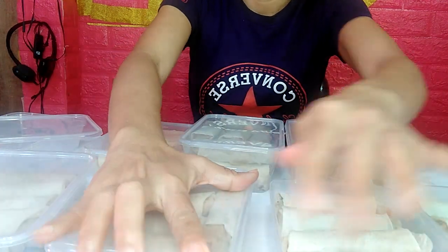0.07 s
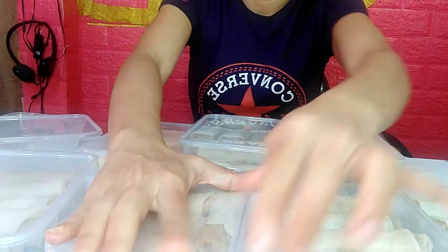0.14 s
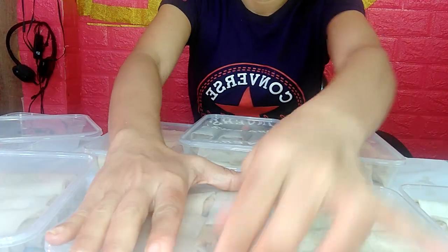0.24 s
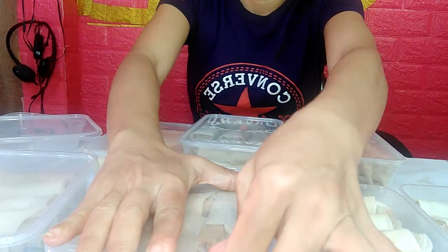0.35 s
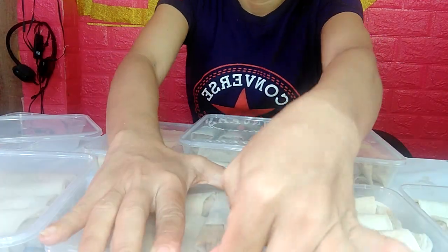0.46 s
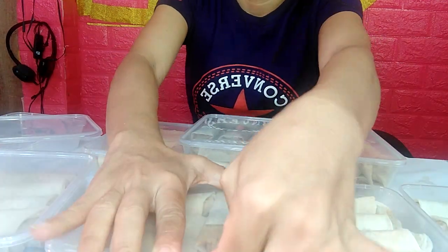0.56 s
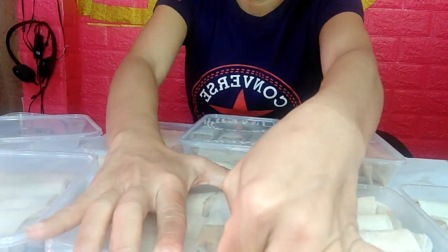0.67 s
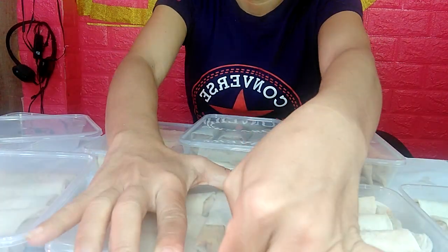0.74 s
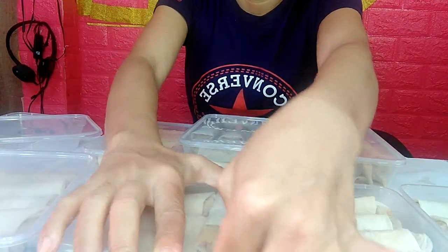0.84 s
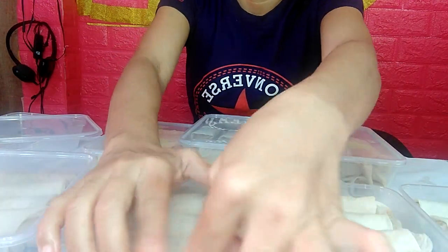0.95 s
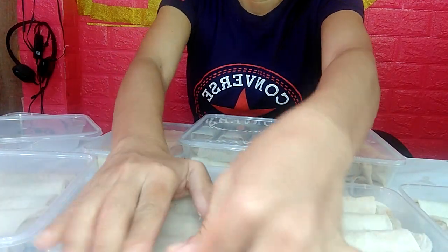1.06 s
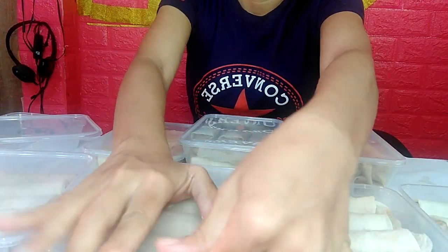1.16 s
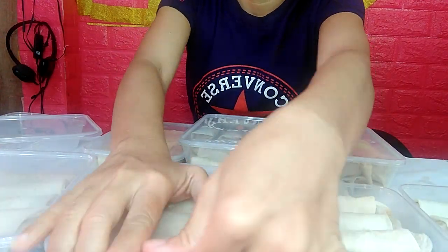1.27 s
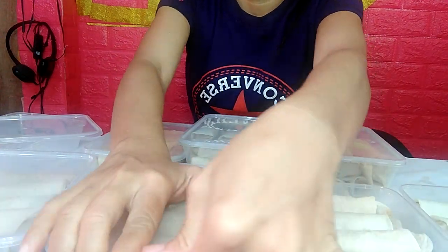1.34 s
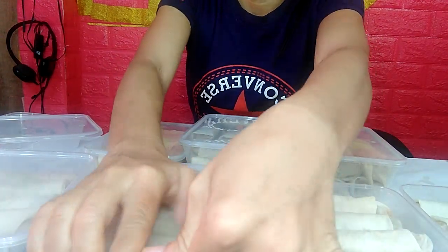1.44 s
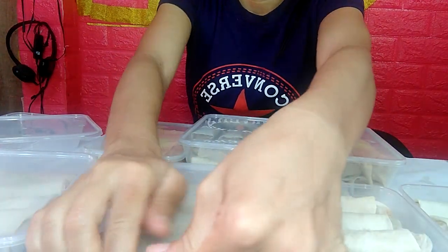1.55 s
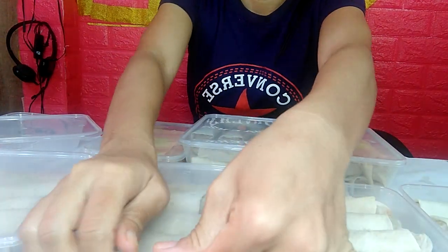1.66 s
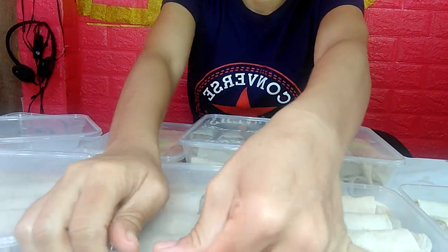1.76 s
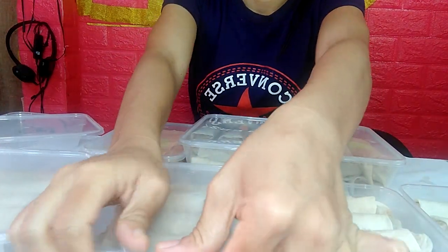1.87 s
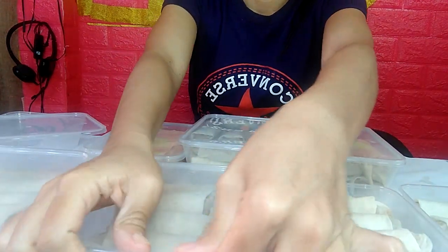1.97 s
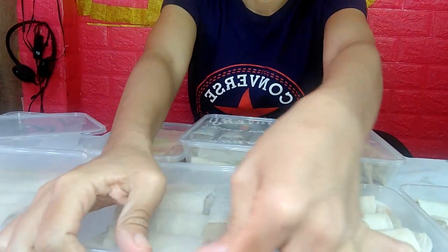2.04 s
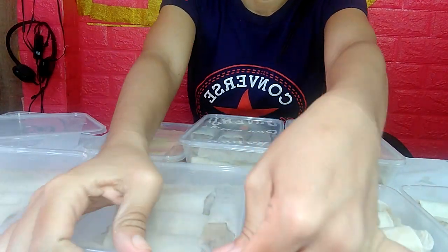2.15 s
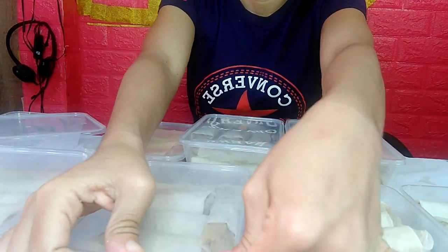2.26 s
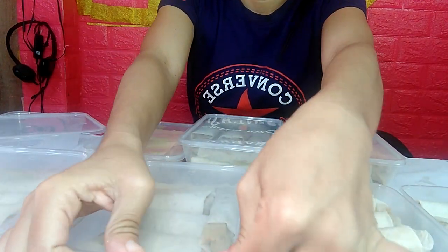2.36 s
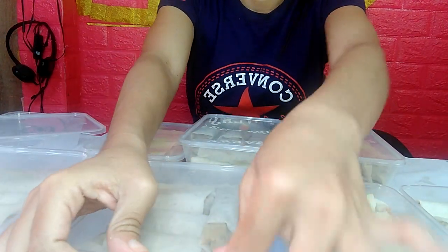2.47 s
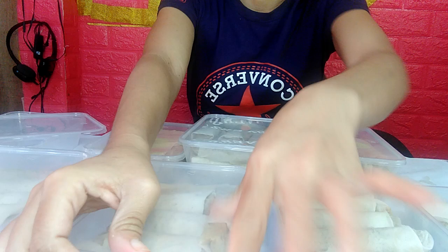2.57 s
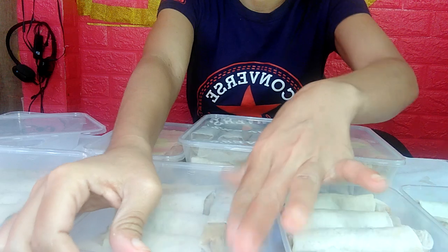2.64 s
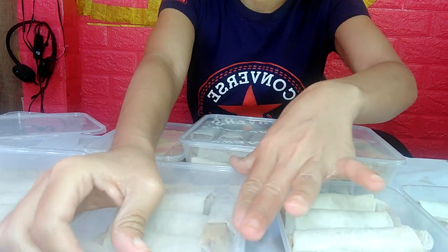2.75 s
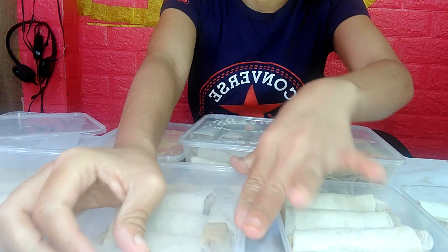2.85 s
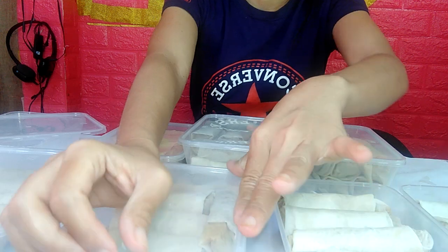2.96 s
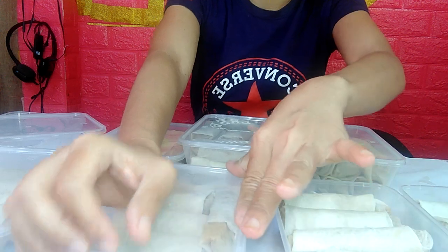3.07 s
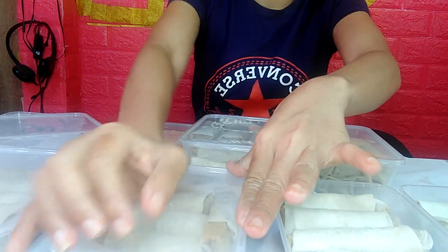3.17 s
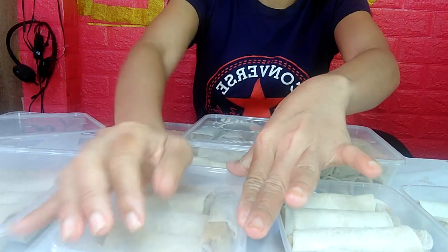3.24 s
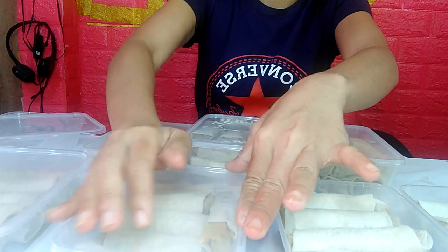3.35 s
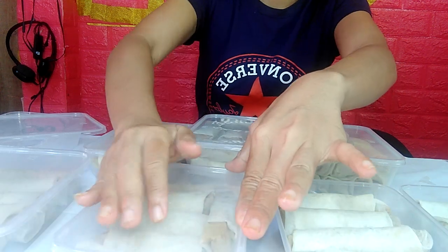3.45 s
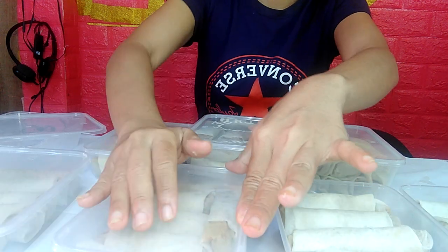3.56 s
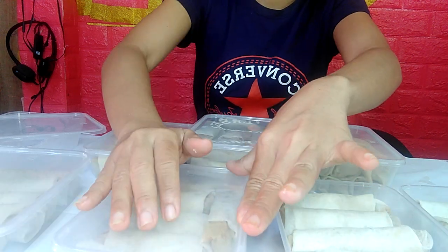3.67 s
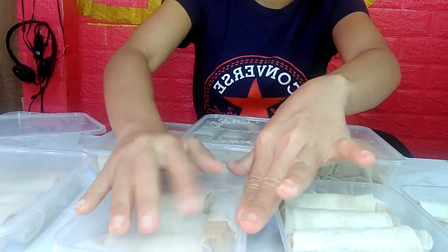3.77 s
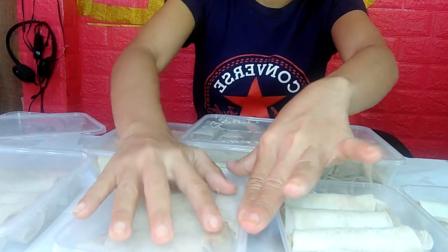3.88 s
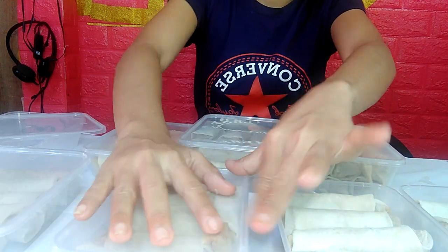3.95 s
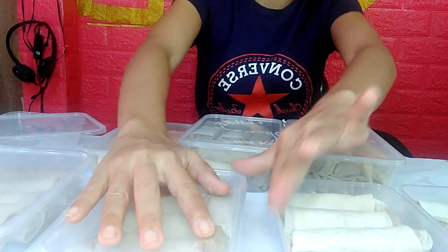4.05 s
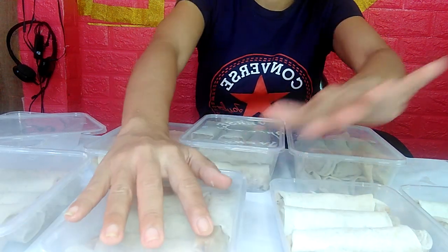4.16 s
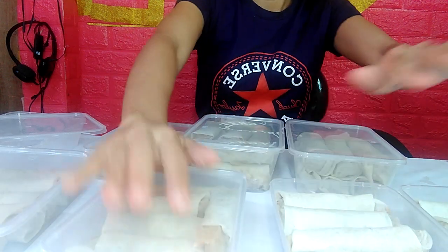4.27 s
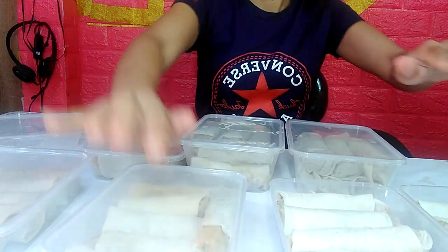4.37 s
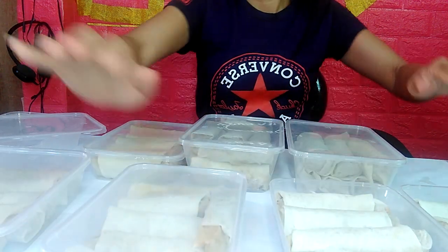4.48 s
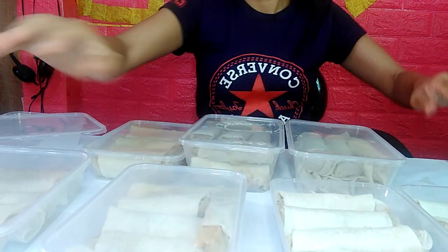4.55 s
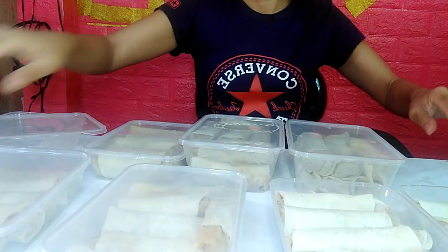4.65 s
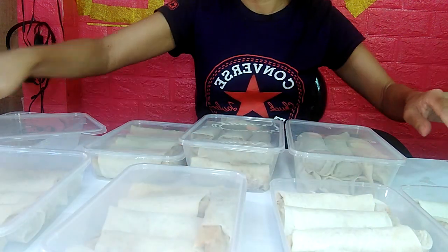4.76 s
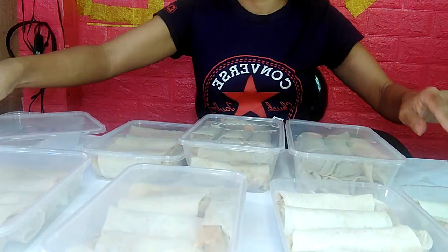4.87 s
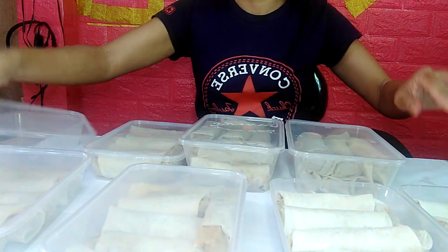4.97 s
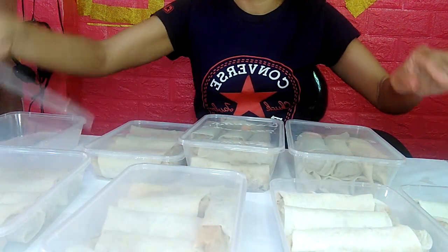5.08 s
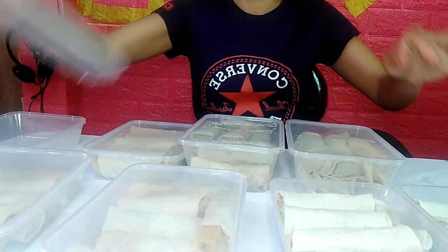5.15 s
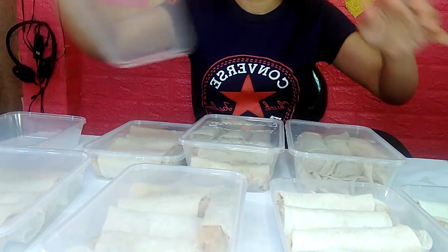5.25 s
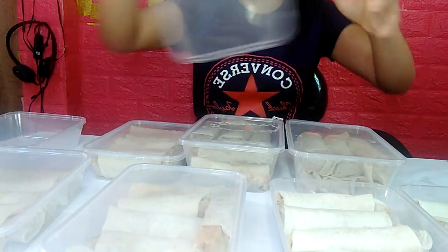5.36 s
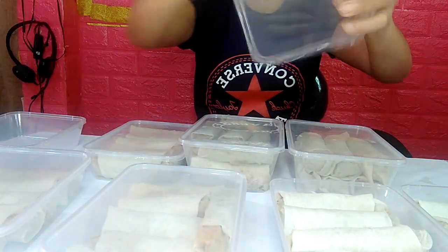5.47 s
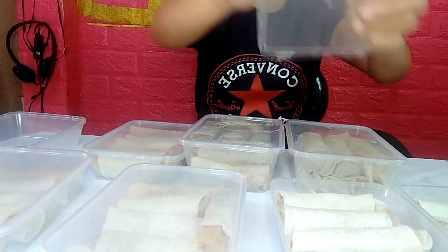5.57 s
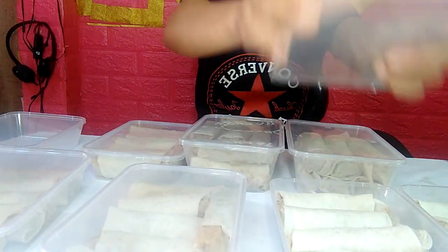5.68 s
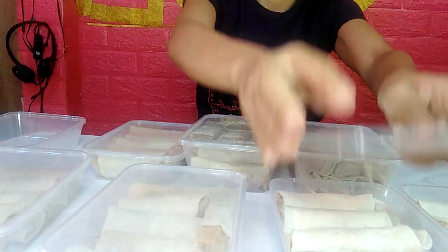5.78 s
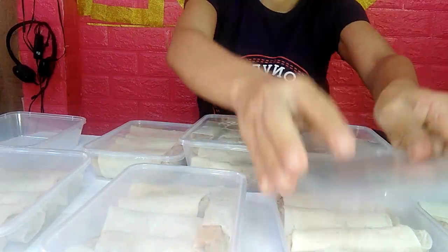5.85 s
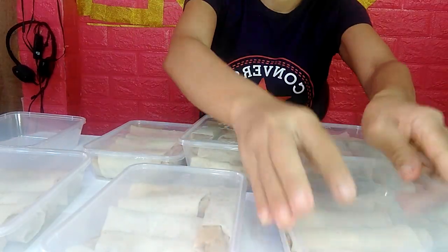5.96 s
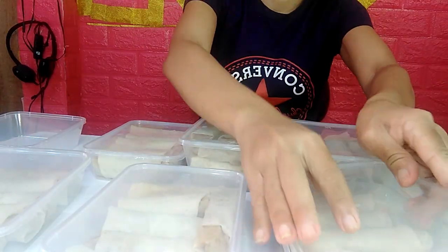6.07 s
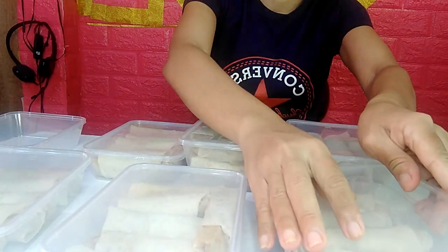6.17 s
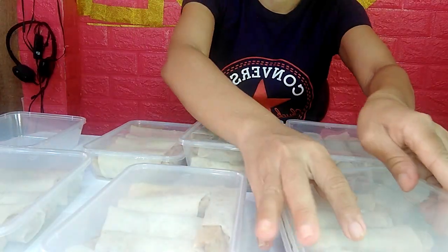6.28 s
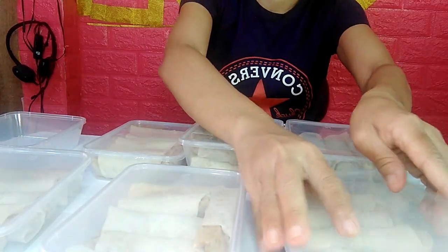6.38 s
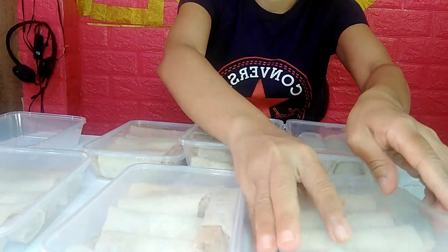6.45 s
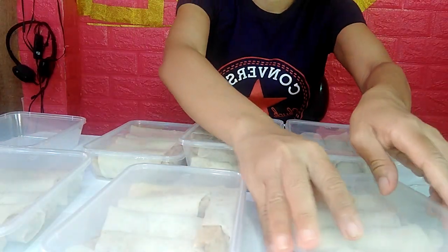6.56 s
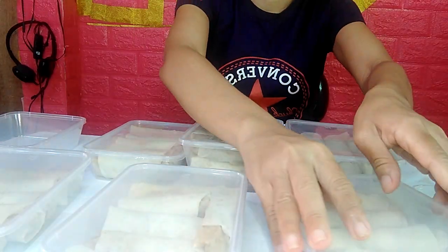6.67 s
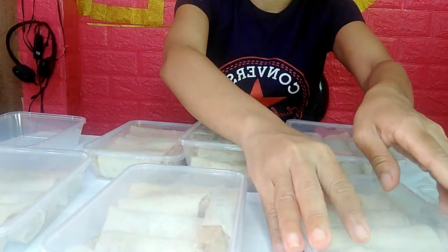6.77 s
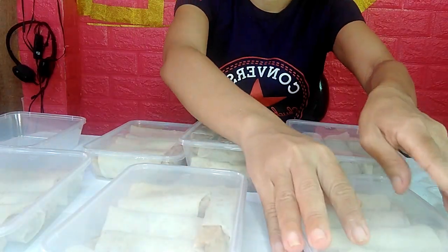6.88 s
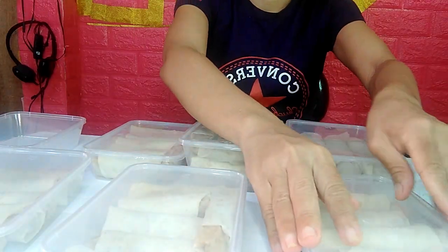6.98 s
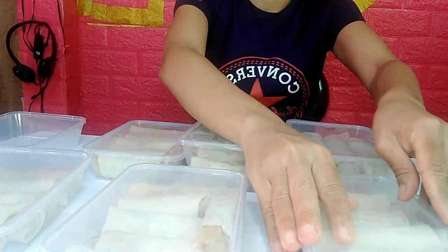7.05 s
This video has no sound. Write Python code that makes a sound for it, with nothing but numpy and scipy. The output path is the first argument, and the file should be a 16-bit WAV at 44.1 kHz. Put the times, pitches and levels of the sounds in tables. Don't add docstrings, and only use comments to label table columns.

```python
import sys
import numpy as np
from scipy import signal
from scipy.fft import rfft, irfft
from scipy.io import wavfile
from scipy.ndimage import uniform_filter1d, minimum_filter1d

SR = 44100
rng = np.random.default_rng(int(sys.argv[2]) if len(sys.argv) > 2 else 0)


def ratio_of_db(decibels):
    return 10 ** (np.asarray(decibels, float) / 20)


def to_wav(s):
    ch = np.atleast_2d(s).T
    pcm = np.round(np.clip(ch, -1, 1) * 32767)
    wavfile.write(sys.argv[1], SR, pcm.astype(np.int16))


N = 313991

# time [s], peak at 1.5-4 kHz [dB],
# then panel, edge, sizzle [dB relative to it].
SNAPS = [(0.5546, -45.5, 3, -15, -21.5), (0.7912, -12, -5, -4.5, 0.5), (0.882, -30.5, -3, -14, -1),
         (0.9271, -35, -12.5, -10, -6.5), (1.0561, -45.5, 15.5, -22.5, -19), (1.0952, -44.5, 10.5, -2.5, 3),
         (1.5291, -45, 19, -15, -4), (1.5484, -30.5, -4, -11.5, -3), (1.6088, -29, 7, -59, -53),
         (1.6739, -31, 8, -27, 6), (1.6826, -26.5, 4.5, -4, -1.5), (1.8712, -31.5, -29.5, 2, -3),
         (1.985, -32.5, -28.5, 6, -3.5), (2.1478, -43, -10, 12, 4), (2.1531, -42, -11.5, 2, 12.5),
         (2.3441, -11, -7, -13.5, -0.5), (2.815, -41.5, 3, -29, -4.5), (3.0574, -20.5, -3.5, 3, 0),
         (3.0677, -18.5, 2.5, -23, 5), (3.1872, -45, -17.5, 2.5, -1.5), (3.6565, -28, 15, 2, 8),
         (4.1847, -42.5, 7.5, 8.5, 5), (5.1876, -44, -24.5, -6, 9), (6.0154, -22.5, -16.5, -0.5, 1.5),
         (.2298, -22, 1, -14.5, -5), (.2350, -20, 7.5, -9, -2.5), (.2372, -13, 0, -7, -0.5),
              (.2385, -8, -5.5, -6, -0.5), (.2505, -24.5, 3, -3, -0.5), (1.6795, -33.5, 3.5, -3.5, 4),
              (1.6808, -30, 0, -5.5, 7.5), (2.3452, -15, -10.5, -8, 0), (2.351, -19, 5, -7.5, -2.5),
              (2.3583, -25, -4, -8, 2), (2.363, -22, -6.5, -8.5, 4), (2.3725, -22, -6, -12.5, -0.5),
              (2.3852, -30.5, -1.5, -10, -1.5), (3.0588, -23, -8.5, 6, 7), (3.0644, -37.5, -5, 19, 13),
              (3.6505, -52, 2, 2, 8), (3.6533, -45, -14, -8, 9), (4.1785, -51.5, 10, 0, 6.5),
              (6.0079, -52, -11.5, 0, 1), (6.0245, -30, -5.5, 0, 0), (6.0367, -43, 4.5, -3, -9.5),
              (6.0528, -39.5, -1, -5, 3), (6.075, -45, 2.5, 3, 3)]
SNAP_BANDS_HZ = [60, 350, 950, 2800, 5200, 8300, 16000]
SNAP_ENDS_DB = [-12.5, -37.5]
BODY_DB = -4.5
# frequency [Hz], gain [dB].
LID = [(700, 2), (1100, 1), (1950, 1), (2900, -0.5), (5500, 0.5), (7700, -1), (11000, 0)]
FIRST_PRESSES = {.236: [(2163, -5), (2950, 4), (5790, -5.5), (7130, 9), (8130, 4), (8950, -5)],
                 .791: [(1210, 5.5), (2240, -10), (2990, 6), (3900, -8.5), (7300, 8), (7950, 8),
                 (10100, 9)], .882: [(2950, 7), (5650, 7), (7630, 7), (9440, -9), (10590, 7), (12400, 8)],
                 .927: [(2950, 8), (3800, -14), (4850, 11), (7000, 12), (8700, -10), (9880, 14),
                 (10570, 19), (11700, 22)], 1.548: [(1160, 8), (4270, 7.5), (5500, -5), (6160, -9),
                 (7460, 17.5), (8660, 9.5), (9530, 7), (11800, -16)], 1.609: [(2250, 10.5), (3680, -17)],
                 1.678: [(2070, 8.5), (3650, -9), (4100, -10), (6520, 8), (7220, 7), (7980, -7),
                 (10280, 9)], 1.871: [(1300, 11), (2250, -17), (3090, 6), (4350, 6), (6210, -6),
                 (6830, 5.5), (7385, 7), (8100, -5), (9120, 9), (11500, 8)], 1.985: [(2990, 12), (4177, -6),
                 (4970, 5.5), (6250, -15), (6850, -8), (7350, 6), (7870, -9), (9470, -10)],
                 2.149: [(2400, -12), (3100, 10), (4410, 10), (5300, -10), (6620, 10), (7120, 10),
                 (7620, 7), (9640, -15), (10900, 8)], 2.344: [(2500, 3.5), (3350, -5), (4757, -5),
                 (6083, -5), (7224, 5)]}
LATER_PRESSES = {3.062: [(4000, -5.5), (5620, -5), (7200, -7.5)], 3.187: [(4590, 13), (5370, -8),
                 (5900, -11), (6750, 10)], 3.656: [(2606, -5.5), (3025, 6), (3400, -7), (3910, 7),
                 (4500, -7), (5157, 7), (8000, -17), (8645, 9), (11950, 16), (12810, 6)],
                 4.182: [(1510, 15.5), (2550, -13), (4610, 14), (5050, -9), (5670, 6), (6590, 15),
                 (7370, -15), (8170, 17.5), (9520, 8)], 5.188: [(4000, -12), (4900, -10), (5400, 6),
                 (6320, 8), (6950, 16), (7700, -9), (9960, -13), (12000, 10)], 6.015: [(1450, -8),
                 (4920, -8), (5970, -17.5), (7810, 6.5), (8600, -12.5), (10940, -8)], 6.336: [(1796, 16),
                 (2734, -7), (3290, -11), (4070, 18), (5390, -9.5), (6700, 12), (9210, 15), (10190, 11)],
                 6.417: [(2045, 14), (3140, -8.5), (3660, 20), (4910, -13), (5700, 10), (6560, 12.5),
                 (8700, 11), (9240, 20), (11090, -13)], 6.46: [(1200, -6), (1970, 6.5), (2490, 5),
                 (3291, -8)]}
MODE_WIDTH_HZ = 200

# time [s], peak at 1.5-4 kHz [dB], brightness [dB].
CRUNCH = [(6.2504, -46.5, -24.5), (6.3363, -33, -17.5), (6.3446, -46.5, -14), (6.4143, -34.5, -13.5),
          (6.4194, -27.5, -14), (6.438, -46, 1), (6.4452, -32, -1.5), (6.4485, -28, -3.5), (6.4644, -33, 5),
          (6.4672, -29.5, 0.5), (6.4697, -33, 0), (6.4805, -31.5, 3), (6.484, -25.5, 3), (6.4885, -33, -7),
          (6.493, -33.5, -13), (6.4985, -33.5, 0.5), (6.5025, -34, 5), (6.5088, -43.5, -5),
          (6.5306, -33.5, -2), (6.5492, -40, -8.5)]
CRUNCH_HZ = [300, 1150, 1650, 2650, 3300, 4500, 8300, 15000]
CRUNCH_PANEL_DB, NOTCH_DB = -20.5, -10
# start, loudest moment, end [s].
CRACKLE_S = (6.449, 6.487, 6.565)
CRACKLE_DB, CRACKLE_FADE_DB, CRACKLE_BRIGHT_DB = -35.5, -12.5, 0.5
# time [s], peak at 1.5-4 kHz [dB], brightness [dB].
TICKS = [(0.6513, -55.5, 14.5), (1.8244, -69, 6.5), (2.8294, -52.5, -7.5), (2.8594, -62.5, -8),
         (2.9794, -58.5, 12), (3.0094, -51.5, 3.5), (5.0083, -49, 1.5), (5.1209, -62, 5), (5.5972, -58, 2),
         (6.7184, -66.5, 5), (6.785, -64, 12.5)]
TICK_PANEL_DB, TICK_EDGE_DB = -8.5, -9.5

# time [s], peak
# [dB], frequency [Hz].
CREAKS = [(0.072, -44.5, 450), (0.234, -7, 688), (0.647, -47, 828), (0.697, -47.5, 424.7),
          (0.748, -39.5, 269), (0.795, -25, 1080), (1.06, -42, 847), (1.055, -44, 452), (1.095, -50, 471),
          (1.35, -47, 440), (1.093, -38.5, 685), (1.12, -37.5, 690), (1.215, -38.5, 266), (1.3, -47, 429.8),
          (1.502, -42.5, 430), (1.608, -31, 445), (1.527, -33.5, 453), (1.68, -29, 223), (1.99, -41.5, 286),
          (2.065, -44, 285), (2.035, -47, 690), (2.095, -43, 646), (.552, -47, 602), (2.15, -42, 288.5),
          (2.626, -46, 433), (2.809, -41, 271), (2.9, -48, 426), (3.278, -44.5, 195.4),
          (3.354, -45.5, 271.4), (3.584, -42, 433), (3.654, -33, 755),
          (3.883, -44.5, 427), (4.125, -47.5, 289.6), (5.37, -47, 446), (4.489, -48, 1024),
        (4.637, -49.5, 981), (4.976, -58, 245.8), (5.236, -42.5, 277), (5.367, -40.5, 245),
        (5.45, -38, 250), (5.515, -43, 239.5), (5.685, -39.5, 258.6), (6.018, -40.5, 311.3),
        (6.185, -42, 267.3), (6.23, -41.5, 280), (6.225, -47.5, 561), (6.367, -48.5, 524),
        (6.451, -49, 188.6), (6.525, -47, 1046), (7.003, -44, 298)]
# time [s], peak [dB], frequency [Hz].
CHIRPS = [(.01, -55.5, 2916), (.158, -56, 2957), (.55, -62.5, 5300), (.555, -60.5, 3930),
          (.75, -65.5, 5030), (1.052, -54, 2720), (1.068, -53, 1720), (1.092, -49.5, 4693),
          (.927, -57, 2950), (1.285, -48, 1140), (1.327, -55.5, 2200), (1.43, -51.5, 1960),
          (1.988, -46.5, 1971), (2.148, -50.5, 1775), (2.68, -55, 2951), (2.81, -43.5, 1761),
          (2.803, -42, 1130), (2.81, -53, 697), (2.92, -50, 1300), (3.189, -47, 3880), (3.242, -52, 2060),
          (3.84, -60.5, 2190), (3.93, -45.5, 670), (5.59, -44.5, 1038), (5.48, -48.5, 826.7),
          (5.81, -49, 879), (5.97, -52.5, 1856)]
# time [s], peak [dB], frequency [Hz].
AFTER_RINGS = [(1.686, -45, 1960), (2.152, -50.5, 4316), (2.349, -28, 2147), (3.658, -36.5, 11500),
               (2.352, -30, 7400), (3.661, -44.5, 1863), (3.671, -41, 992.5), (3.672, -41, 303),
               (3.8, -48.5, 906), (4.186, -60.5, 1402), (5.594, -53, 8250), (1.70, -40, 1196),
               (6.021, -46.5, 950), (6.031, -43.5, 468), (6.231, -47.5, 1900), (6.236, -57, 4990),
               (6.336, -46, 2000)]
# time [s], peak [dB], frequency [Hz].
PIPS = [(1.02, -54, 2150), (1.2, -60, 5420), (1.205, -38, 780), (1.24, -53, 2700), (2.808, -53.5, 6250),
        (1.81, -41, 1002), (2.93, -53.5, 3400), (5.01, -59.5, 8786), (5.098, -58, 7780), (2.133, -45, 1154),
        (5.108, -59, 4990), (5.51, -53, 3260), (5.008, -52, 4750), (5.61, -56.5, 2590), (5.005, -60, 6750),
        (6.715, -65, 7800), (6.72, -56, 3470), (6.174, -62, 5426), (1.76, -46, 1250), (6.775, -55.5, 8580),
        (6.76, -58, 3617), (6.935, -64, 2410), (6.975, -53, 1006)]
# time [s], frequency [Hz].
GLINTS = [(.003, 1780), (.145, 1000), (2.046, 2928), (2.055, 6718), (2.18, 2540), (2.24, 3789),
          (2.818, 4737), (2.986, 1291), (2.992, 6718), (3.486, 861), (4.025, 1291), (4.095, 2200),
          (4.32, 2196), (4.355, 2020), (4.372, 1450), (4.414, 1679), (4.42, 2971), (4.446, 4220),
          (5.006, 1765), (5.024, 2370), (5.056, 1248), (5.33, 1050), (5.6, 2000), (5.747, 3531)]
GLINT_DB, GLINT_DB_PER_OCTAVE = -46.5, -5
CREAK_T60, CHIRP_T60, RING_T60, PIP_T60 = 0.22, 0.22, 0.28, 0.095
HALVES_PER_DB = 18.5
# time [s], peak [dB], frequency [Hz], T60 [s].
KNOCKS = [(0.24, -30.5, 180, 0.12), (3.0585, -30.5, 559, 0.13), (3.0685, -17.5, 453, 0.039),
          (3.07, -27.5, 224.3, 0.16), (4.1843, -32, 1353, 0.0095), (5.008, -50, 5000, 0.033),
          (5.109, -58, 5400, 0.04), (5.597, -46.5, 8350, .05), (.236, -26, 380, 0.06),
          (2.35, -31.5, 400, 0.11), (.238, -17, 1050, 0.035), (5.425, -19, 113, 0.057),
          (5.461, -17.5, 81, 0.048), (5.52, -34, 100, 0.15), (5.748, -35.5, 99, 0.25),
          (6.3917, -32, 112, 0.1), (2.345, -26, 257.6, 0.097), (3.708, -32.5, 149.7, 0.089),
          (.885, -41, 470, 0.099)]

# time [s], peak [dB], T60 [s].
THUDS = [(0.0, -62, .15), (0.24, -46.5, 0.51), (0.82, -46.5, 1.3), (1.05, -62, .8), (1.21, -56.5, 0.47),
         (1.488, -54.5, .5), (1.659, -52.5, 1.1), (2.05, -59, 1.5), (2.37, -46.5, 0.49), (2.5, -61, 0.35),
         (2.829, -55, 1.3), (3.08, -52.5, .7), (3.261, -54.5, .4), (3.72, -47, .9), (4.0, -59, .5),
         (5.062, -51.5, .7), (5.431, -47, 0.77), (5.55, -52, 0.46), (5.73, -48.5, .6), (5.89, -56.5, .4),
         (6.4, -51.5, .8), (6.54, -56, .4), (7.0, -61, 0.87)]
# frequency [Hz], width [Hz], level [dB].
FLEX = [(65.5, 19, 0.5), (109, 7.1, -7.5), (129.5, 22, -2)]
THUD_RISE_S, REST_DB = 0.027, -73
# time [s], level [dB].
RUBBING = [(0, -55), (.15, -52), (.45, -63), (.75, -54), (.93, -50.5), (1.0, -62.5), (1.1, -54.5),
           (1.41, -56.5), (1.55, -50.5), (1.82, -49.5), (1.93, -61.5), (2.05, -53.5), (2.28, -59.5),
           (2.5, -53.5), (2.65, -63.5), (2.85, -53), (3.3, -56), (4.2, -65)]
# time [s], level [dB].
HANDLING = [
    (5.0, -77),
    (5.38, -57),
    (5.651, -62),
    (5.74, -51.5),
    (5.82, -62),
    (5.949, -61.5),
    (6.22, -57),
    (6.35, -58.5),
    (6.502, -54.5),
    (6.62, -75.5),
]
# frequency [Hz], width [Hz], level [dB].
WALLS = [(259, 41, 7), (450, 98, 7), (600, 140, 1.5), (950, 200, -4.5), (1300, 120, -10), (1970, 650, -14)]
LUMPS_DB, SWAY_DB = 4, -11
STEADY_S = 0.09

# start [s], length [s], level [dB].
SQUEAL = [
    (2.66, .2, -60.5),
    (2.85, 0.22, -62.5),
    (3.096, 0.14, -60),
    (3.327, .05, -70.5),
    (3.42, 0.043, -67.5),
]
SQUEAL_HZ, WANDER_HZ = 7830, 45.6
# frequency [Hz], density [dB per Hz].
HISS = [(15, -47), (25, -19), (64, 9), (97, -7), (125, 2.5), (175, -8.5), (270, 4.5), (344, -12.5),
        (659, -4.5), (887, -9.5), (988, -5), (1560, -11), (2050, -10), (5140, -19), (7920, -18),
        (10700, -32.5), (16000, -50.5)]
HISS_DB = -66.5
STIR_PER_S, STIR_DB = 70, 7
# frequency [Hz], T60 [s].
ROOM = [(100, 1), (260, 0.6), (700, 0.6), (1840, 0.44), (4850, 0.37), (12800, 0.33)]
ROOM_DB = -8.5
TABLE_GAIN, TABLE_T60 = 1.4, 0.079

SUPPRESS_DB, OPENS_DB, CLOSES_DB_PER_S = 13, 9.5, 190
CEILING = 0.9
MIC_HZ = [40, 16000]


def snap(s, peak_db, colour):
    chance = rng.standard_normal(3073)
    hz, t = np.fft.rfftfreq(2048, 1 / SR), np.arange(2048) / SR
    patchy_db = np.clip(-0.2 * (peak_db + 5), 2, 5.5)
    patches = evened(uniform_filter1d(chance[2048:], size=10))
    modes_db = lid_modes(s, hz) + 0.6 * patchy_db * patches
    crack = rfft(chance[:2048] * np.exp(-t / 0.00057))
    crack = irfft(crack / abs(crack))
    crack = np.roll(crack, 40) * np.exp(-t / 0.0031)
    rattle = chance[2047::-1] * np.exp(-t / 0.019) * np.minimum(t / 0.00024, 1)
    burst = crack + 0.32 * rattle / np.linalg.norm(rattle)
    sound = signal.fftconvolve(burst, causal(read(colour, hz) + modes_db)[:1500])
    middle_band = signal.butter(2, [1500, 4000], "band", fs=SR, output="sos")
    middle = signal.sosfilt(middle_band, sound)
    return s - 0.001, ratio_of_db(peak_db) * sound / abs(middle).max()


def rim_colour(panel, edge, sizzle):
    body = panel + BODY_DB
    low_end, high_end = body + SNAP_ENDS_DB[0], sizzle + SNAP_ENDS_DB[1]
    own = list(zip(SNAP_BANDS_HZ, [low_end, body + 8, panel + 4, 0, edge, sizzle - 3, high_end]))
    hz = np.geomspace(SNAP_BANDS_HZ[0], SNAP_BANDS_HZ[-1], num=60)
    return list(zip(hz, read(own, hz) + read(LID, hz)))


def lid_modes(s, hz):
    presses = {**FIRST_PRESSES, **LATER_PRESSES}
    at = min(presses, key=lambda press: abs(press - s))
    mode_hz, db = np.transpose(presses[at])
    bumps = np.exp(-0.5 * ((hz[:, None] - mode_hz) / MODE_WIDTH_HZ) ** 2)
    return (abs(at - s) < 0.075) * (db * bumps).sum(1)


def crunch_colour(bright):
    low = [CRUNCH_PANEL_DB - 5.5, CRUNCH_PANEL_DB]
    high = [bright + NOTCH_DB, bright, bright - 4, bright - 38]
    return list(zip(CRUNCH_HZ, low + [0, 0] + high))


def crackle(count):
    place, size = rng.random((2, count))
    start, _, end = CRACKLE_S
    s = start + (np.arange(count) + place) / count * (end - start)
    db = CRACKLE_DB + np.interp(s, CRACKLE_S, [-3, 0, CRACKLE_FADE_DB]) - 10.0 * size
    return [(at, peak, CRACKLE_BRIGHT_DB) for at, peak in zip(s, db)]


def tick_colour(bright):
    return rim_colour(TICK_PANEL_DB, TICK_EDGE_DB + bright / 2, bright)


def creak(s, peak_db, hz, spread, soft_t60, length=12000):
    t = np.arange(length) / SR
    t60 = soft_t60 * 2 ** min(-(peak_db + 47.0) / HALVES_PER_DB, 0.25)
    rise = np.sin(np.pi / 2 * np.minimum(t / 0.0055, 1)) ** 2
    shape = ratio_of_db(peak_db - 5.5 - 60 * t / t60) * rise
    mode = ring(rng.standard_normal(length), hz, 45 + spread * hz)
    return s, evened(shape * mode) * np.sqrt(np.mean(shape ** 2))


def glint(s, hz):
    peak_db = GLINT_DB + GLINT_DB_PER_OCTAVE * np.log2(hz / 1000)
    return creak(s, peak_db, hz, 0.012, PIP_T60, length=6000)


def knock(s, peak_db, hz, t60):
    t = np.arange(0, t60, 1 / SR)
    return s, ratio_of_db(peak_db - 60 * t / t60) * np.sin(2 * np.pi * hz * t) * np.minimum(t * hz / 0.52, 1)


def hands():
    t, coarse = np.arange(N) / SR, np.arange(0, N / SR + 0.01, 0.002)
    shake, rub, lumps = rng.standard_normal((3, N))
    flex = sum(ratio_of_db(db) * ring(shake, hz, width) for hz, width, db in FLEX)
    lumps_db = LUMPS_DB * evened(uniform_filter1d(lumps, size=1400))
    walls = np.zeros(N)
    for k, (hz, width, db) in enumerate(WALLS):
        walls += ratio_of_db(db + np.roll(lumps_db, 9000 * k)) * ring(rub, hz, width)
    bend = ratio_of_db(REST_DB)
    for s, db, t60 in THUDS:
        away = np.maximum((s - coarse) / THUD_RISE_S, 2 * (coarse - s) / t60)
        bend = bend + ratio_of_db(db - 25 * np.minimum(away, 9))
    skin = 0
    for curve in (RUBBING, HANDLING):
        skin = skin + ratio_of_db(np.interp(coarse, *np.transpose(curve), left=-99, right=-99))
    palm = np.interp(t, coarse, bend + ratio_of_db(SWAY_DB) * skin) * levelled(flex)
    return palm + np.interp(t, coarse, skin) * levelled(walls)


def squeal(s, length, db):
    breath, drift = rng.standard_normal((2, round(length * SR)))
    hz = SQUEAL_HZ + WANDER_HZ * evened(uniform_filter1d(drift, size=1500))
    whistle = resonate(resonate(breath, hz, 99.0), hz, 240.0)
    return s, ratio_of_db(db) * evened(whistle) * signal.windows.tukey(len(breath), 0.4)


def hiss():
    frames, hz = N // 256 + 5, np.fft.rfftfreq(1024, 1 / SR)
    real, imaginary = rng.standard_normal((2, 513, frames))
    where = (hz > 300) * np.exp(-hz / 1500.0) * 43 / 1500.0
    starts = rng.random((513, frames)) < STIR_PER_S * 256 / SR * where[:, None]
    stir = uniform_filter1d(uniform_filter1d(9.0 * starts, size=3, axis=0), size=3, axis=1)
    level = ratio_of_db(read(HISS, hz)[:, None] + STIR_DB * np.minimum(stir, 1))
    noise = signal.istft((real + 1j * imaginary) * level, nperseg=1024, noverlap=768)[1][:N]
    return ratio_of_db(HISS_DB + SUPPRESS_DB) * evened(noise)


def room_tail():
    taps = np.zeros(SR // 2)
    at = np.arange(150, len(taps) - 12, 12)
    taps[at + rng.integers(0, 12, len(at))] = rng.choice([-1.0, 1.0], len(at))
    hz, t, z = signal.stft(taps, SR, nperseg=256)
    walls = ratio_of_db(-60 * t / read(ROOM, hz)[:, None])
    table = TABLE_GAIN * ratio_of_db(-60 * t / TABLE_T60)
    out = signal.istft(z * (walls + table), SR, nperseg=256)[1]
    return out / np.linalg.norm(out)


def evened(x):
    return x / np.sqrt(np.mean(x ** 2) + 1e-20)


def levelled(x):
    power = uniform_filter1d(x ** 2, size=round(STEADY_S * SR))
    return x / np.sqrt(power + 0.081 * np.mean(x ** 2))


def read(points, hz):
    f, value = np.transpose(points)
    return np.interp(np.log(hz + 1), np.log(f + 1), value)


def causal(gain_db):
    log_gain = np.log(ratio_of_db(np.r_[gain_db, gain_db[-2:0:-1]]))
    return np.fft.ifft(np.exp(signal.hilbert(log_gain).conj())).real


def ring(x, hz, width):
    once = signal.lfilter(*signal.iirpeak(hz, hz / width, SR), x)
    return signal.lfilter(*signal.iirpeak(hz, hz / width / 2, SR), once)


def resonate(x, hz, width):
    turn = np.exp(2j * np.pi * np.cumsum(hz * np.ones(len(x))) / SR)
    r = np.exp(-np.pi * width / SR)
    return 2 * (turn * signal.lfilter([1 - r], [1, -r], x / turn + 1e-18)).real


def add(mix, s, sound):
    part = mix[round(s * SR):][:len(sound)]
    part += sound[:len(part)]


def scene():
    spots, close = np.zeros((3, N)), np.zeros(N)
    steady = hands() + hiss()
    for rows, colour in ((SNAPS, rim_colour), (CRUNCH + crackle(count=36), crunch_colour)):
        for k, (s, peak_db, *balance) in enumerate(rows):
            add(spots[k % 3], *snap(s, peak_db, colour(*balance)))
    for s, peak_db, bright in TICKS:
        add(close, *snap(s, peak_db, tick_colour(bright)))
    for rows, spread, t60 in ((CREAKS, 0.06, CREAK_T60), (CHIRPS, 0.012, CHIRP_T60),
                              (AFTER_RINGS, 0.12, RING_T60), (PIPS, 0.012, PIP_T60)):
        for row in rows:
            add(close, *creak(*row, spread, t60))
    for rows, source in ((GLINTS, glint), (KNOCKS, knock), (SQUEAL, squeal)):
        for row in rows:
            add(close, *source(*row))
    room = sum(signal.fftconvolve(spot, room_tail())[:N] for spot in spots)
    return (spots.sum(0) + ratio_of_db(ROOM_DB) * room + close + steady)[None]


def low_pass(x):
    return signal.sosfilt(signal.butter(12, 16540, fs=SR, output="sos"), x)


def record(dry):
    t, z = signal.stft(dry[0], SR, nperseg=1024, noverlap=896)[1:]
    power = uniform_filter1d(abs(z) ** 2, size=5, axis=0)
    power = uniform_filter1d(power, size=3, axis=1, origin=1)
    noise = uniform_filter1d(np.percentile(power[:, ::4], 20, axis=1), size=9)[:, None]
    over_db = 10 * np.log10(power / noise + 1e-9) - OPENS_DB
    shut_db = SUPPRESS_DB / (1 + np.exp(np.clip(over_db / 1.2, -30, 30)))
    fall = CLOSES_DB_PER_S * t
    open_db = -minimum_filter1d(shut_db, size=9, axis=1, origin=4)
    held_db = np.maximum.accumulate(fall + open_db, axis=1) - fall
    clean = signal.istft(z * ratio_of_db(held_db), nperseg=1024, noverlap=896)[1][None, :N]
    limited = CEILING * np.tanh(clean / CEILING)
    low_cut = signal.butter(2, MIC_HZ[0], "high", fs=SR, output="sos")
    high_cut = signal.firwin(255, MIC_HZ[1], fs=SR)[None]
    heard = signal.oaconvolve(signal.sosfilt(low_cut, limited), high_cut, "same")
    return low_pass(heard)


dry = scene()
out = record(dry)
to_wav(out)
```